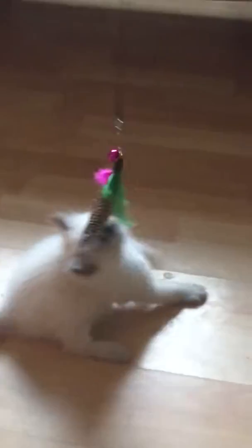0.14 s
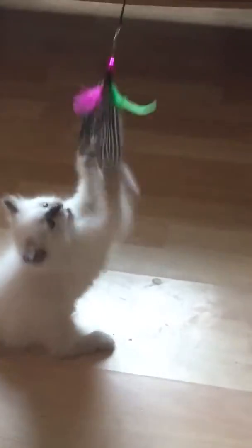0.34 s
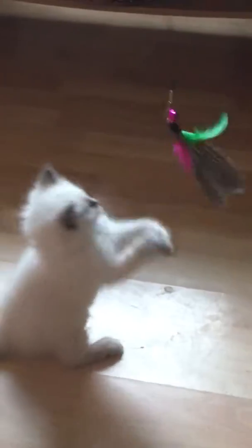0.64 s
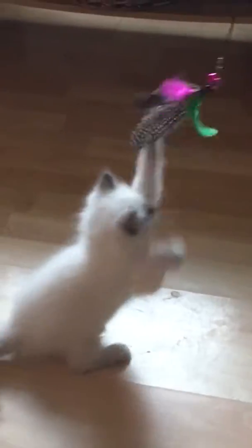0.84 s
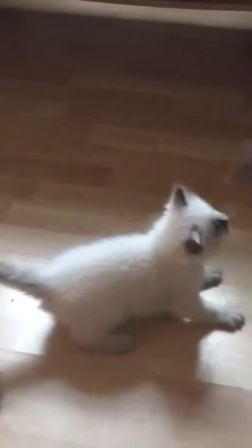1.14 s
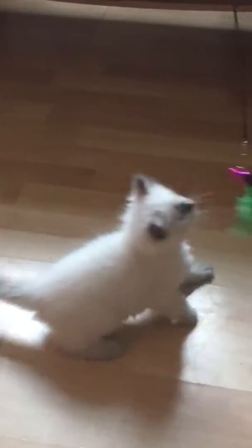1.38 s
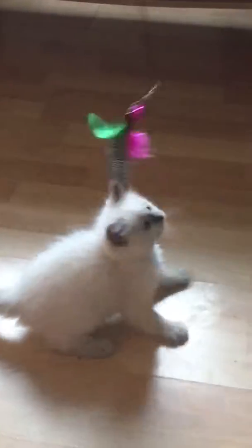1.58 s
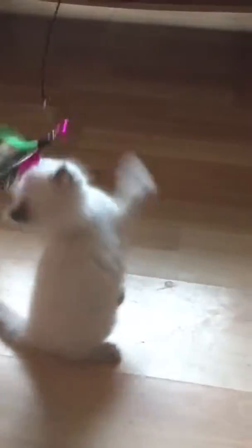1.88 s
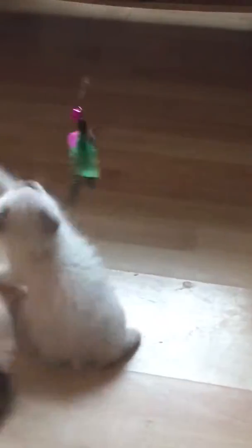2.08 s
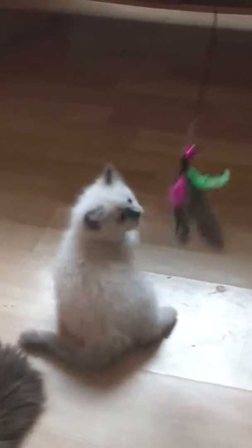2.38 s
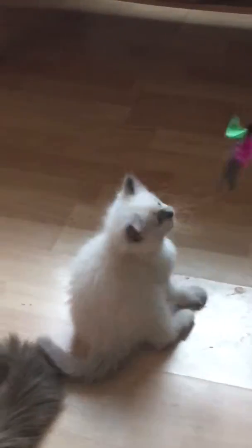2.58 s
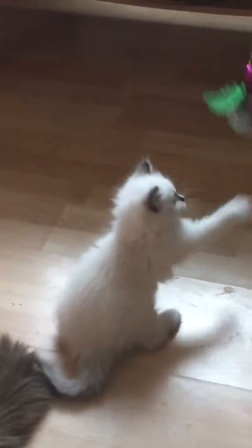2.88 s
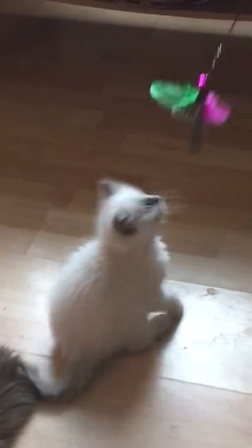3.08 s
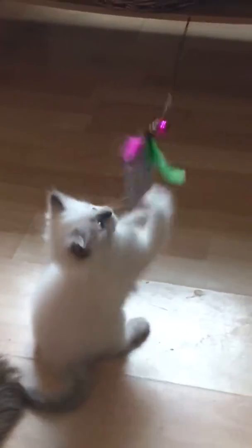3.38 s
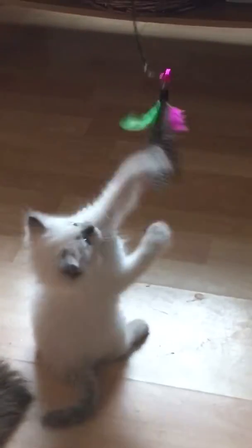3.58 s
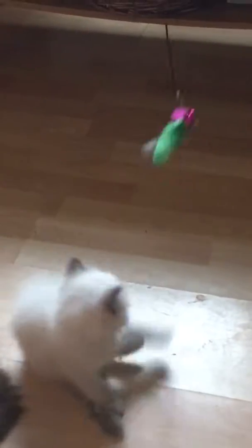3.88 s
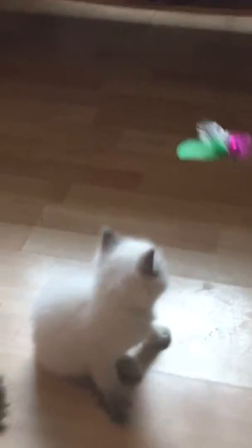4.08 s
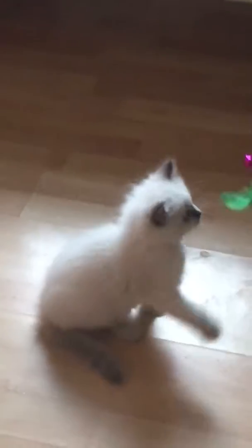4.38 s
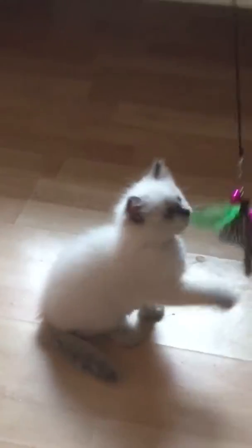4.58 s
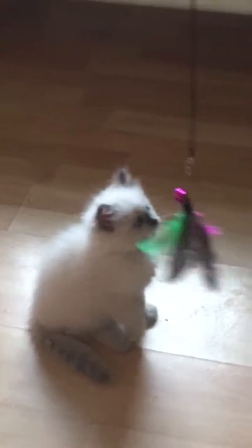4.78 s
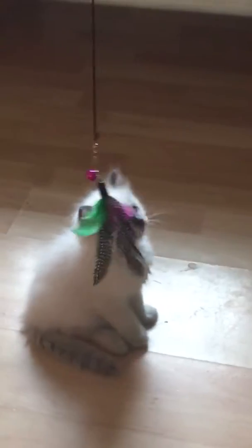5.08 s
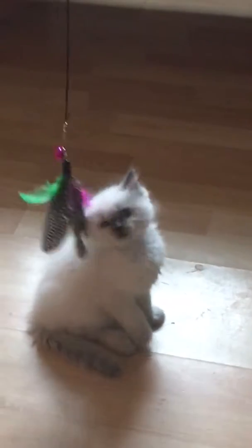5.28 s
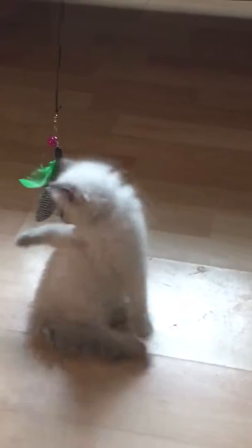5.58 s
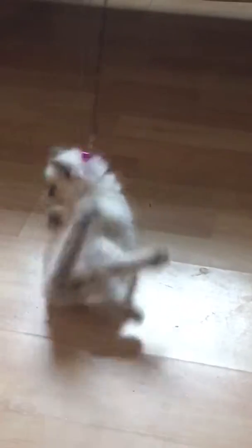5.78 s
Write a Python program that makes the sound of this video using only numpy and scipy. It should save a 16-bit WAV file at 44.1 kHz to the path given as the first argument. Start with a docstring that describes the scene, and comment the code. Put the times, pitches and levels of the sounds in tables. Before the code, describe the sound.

A tiny bell jingles in bursts as a kitten bats a feather toy, with rustles and paws knocking on a hard floor.

```python
"""Kitten batting a feather toy.

The toy dangles on a string above a laminate floor in a quiet room. A pellet strikes the shell of
its tiny bell in bursts; clasp and claws tick, feathers rustle and quills snap. Paws knock and thud
on the boards, the claws skid once, and something rubs faintly with a hollow tone."""
import sys
import numpy as np
from scipy import signal
from scipy.fft import rfft, irfft
from scipy.io import wavfile

SR = 44100
rng = np.random.default_rng(int(sys.argv[2]) if len(sys.argv) > 2 else 0)


def inscribe(sig):
    """Save sig as 16-bit PCM at rate SR to the path in sys.argv[1].

    A 1-D sig is mono; a 2-D sig holds one channel per row.
    Samples are clipped to [-1, 1] before scaling.
    """
    pcm = np.round(np.clip(np.atleast_2d(sig).T, -1, 1) * 32767)
    wavfile.write(sys.argv[1], SR, pcm.astype(np.int16))


N = 261954

# Table levels are relative; each source adds its own gain.
# spectra: (frequency [Hz], density [dB])
AIR_SPECTRUM = [(15, -30), (25, -17.5), (53, 3.5), (92, -0.5), (229, -6), (754, -17.5), (1070, -17),
                (1370, -21), (4030, -23.5), (6740, -24), (7510, -27.5), (10400, -23), (14800, -19.5),
                (16000, -32.5)]
THUD_SPECTRUM = [(30, -8), (55, -0.5), (100, -1.5), (200, 4), (290, 3.5), (420, -15), (900, -38)]
TAP_SPECTRUM = [(300, -76), (700, 4.5), (1200, 5.5), (2400, -3.5), (4000, -1.5), (7000, -4.5), (15000, -32)]
SKID_SPECTRUM = [(300, -13), (950, -4), (1500, -4.5), (2000, 4.5), (2500, 5.5), (3200, -8), (6000, -11),
                 (15000, -18)]
FEATHER_SPECTRUM = [(400, -1), (1500, -4), (3200, -8), (5200, 1), (8000, 5), (10300, -3), (12000, 0),
                    (16000, -1)]
TICK_TOP_SPECTRUM = [(1500, -58), (5000, -11), (8000, -14), (11500, -4), (15000, -5.5)]
TICK_BODY_SPECTRUM = [(600, -10), (1600, -4.5), (3500, -2.5), (5200, -3), (7000, -1), (10000, -15)]
CLACK_SPECTRUM = [(1500, -26), (3700, -14), (4900, 0), (6200, -2.5), (8300, 1.5), (10200, -6), (11500, -1),
                  (16000, -7)]
# reverberation: (frequency [Hz], T60 [s])
ROOM_DECAY = [(150, 0.27), (600, 0.43), (2500, 0.41), (7500, 0.3), (15000, 0.24)]

# friction strokes: (start [s], length [s], level [dB])
RUB_STROKES = [(2.05, 0.44, -75), (4.03, 0.27, -81)]
SHUFFLE_STROKES = [(.43, 0.12, -65), (1.36, 0.054, -63.5), (1.73, 0.088, -60.5), (2.15, 0.39, -66.5),
                   (4.2, 0.42, -72)]
SKID_STROKES = [(.405, 0.048, -53)]
FEATHER_STROKES = [(0.0, 0.26, -63.5), (.44, 0.18, -62), (.97, 0.18, -57.5), (1.33, 0.19, -70),
                   (1.7, 0.13, -60), (2.04, 0.14, -56), (2.35, 0.091, -56.5), (2.77, 0.06, -62.5),
                   (3.19, 0.32, -63), (4.17, .3, -66), (5.25, .3, -69), (5.6, .3, -74.5)]
# rub resonances: (frequency [Hz], width per filter pass [Hz], level [dB])
RUB_MODES = [(1745, 160, 0.5), (3340, 220, -7)]

# paw landings: (time [s], knock [dB], pad thud [dB], claw tap [dB])
LANDINGS = [(0.407, -47.5, -72, -53), (0.417, -50.5, -53, -66), (0.854, -56.5, -58, -69),
            (1.165, -37.5, -49.5, -49.5), (1.183, -31, -65, -49.5), (1.196, -43, -69, -58),
            (1.226, -51, -52.5, -54.5), (1.252, -63, -54, -66), (1.39, -75, -59, -60),
            (1.658, -42.5, -57, -78), (1.665, -47, -54, -55.5), (1.786, -49.5, -64, -52),
            (1.974, -57, -66, -62.5), (2.135, -37, -53, -47), (2.146, -32, -54, -56),
            (3.913, -51.5, -69, -90), (4.885, -80, -66.5, -76)]
# floorboard modes: (frequency [Hz], level [dB], T60 [s])
FLOOR_MODES = [(532.5, -3, 0.036), (617, -0.5, 0.042), (741, -12, 0.059), (870, -6, 0.025),
               (1080, -46, 0.0083), (1830, -11, 0.012), (2060, -14, 0.0081)]
# claws and clasp on the toy: (time [s], level [dB], body re level [dB])
TOY_TICKS = [(0.0667, -51.5, 1), (0.3208, -53.5, -1.5), (0.4758, -50.5, -7), (0.5105, -42.5, -19),
             (0.74, -47.5, -4.5), (0.8818, -52, 1), (0.9344, -54, 4.5), (1.0375, -54.5, 5.5),
             (1.3747, -60.5, 3.5), (1.4872, -54.5, -9), (1.552, -56.5, -3), (2.09, -37.5, -17),
             (2.2962, -42, -10), (2.8406, -53, 1), (3.26, -54.5, -3.5), (4.2531, -49, -11)]
# loudest quill snaps: (time [s], level [dB])
QUILL_SNAPS = [(0.2447, -45.5), (2.0893, -36), (3.3642, -40), (4.4872, -50.5), (5.333, -46),
               (5.3833, -45.5), (5.415, -44), (5.5008, -47), (5.5302, -43), (5.5539, -44), (5.7325, -48.5),
               (5.7545, -48), (5.785, -41), (5.8154, -45.5)]
# pellet strikes on the shell: (time [s], ring [dB], clack [dB])
PELLET_STRIKES = [(0.1376, -50, -51.5), (0.1916, -36, -43.5), (0.5658, -50, -49), (0.5809, -36.5, -44.5),
                  (0.6839, -66, -48.5), (0.734, -35.5, -45), (0.7486, -31.5, -38.5), (0.7847, -38.5, -46.5),
                  (0.8243, -43, -68), (0.957, -54, -45), (0.965, -42.5, -55), (1.046, -40.5, -53),
                  (1.0676, -42, -55), (1.093, -47, -44), (1.106, -39, -41.5), (1.1118, -35.5, -48),
                  (1.1385, -43, -58), (1.1824, -58, -41), (1.5665, -40.5, -44), (1.6358, -46.5, -57),
                  (1.7473, -32.5, -38.5), (1.7563, -31, -42), (1.768, -35.5, -42), (1.7919, -36.5, -43.5),
                  (1.8472, -24.5, -40), (1.857, -19.5, -39.5), (1.872, -36, -40), (1.8852, -48, -42.5),
                  (1.9293, -47, -44.5), (1.94, -23, -41.5), (2.0143, -56.5, -56), (2.0598, -78, -45.5),
                  (2.0915, -52, -42.5), (2.1296, -41.5, -46), (2.261, -51.5, -68), (2.2896, -38, -40),
                  (2.326, -39.5, -51), (2.3605, -50, -65), (2.4115, -53, -42.5), (2.4254, -38, -38.5),
                  (2.4387, -24.5, -57), (2.6362, -51, -52), (2.8401, -37, -38.5), (2.8769, -34.5, -46),
                  (2.9257, -35.5, -50), (3.1037, -45, -56.5), (3.1524, -36, -53), (3.2229, -45.5, -52.5),
                  (3.2444, -55, -49), (3.2722, -37, -45.5), (3.373, -45, -37.5), (3.3796, -40, -38),
                  (3.4222, -34.5, -47), (3.5223, -47, -48), (3.537, -40, -55), (3.6533, -45, -50.5),
                  (3.7041, -45, -70), (3.7814, -48, -50), (3.851, -48, -59), (3.8604, -42, -42.5),
                  (4.182, -48, -53), (4.2056, -32, -45.5), (4.2322, -27.5, -37.5), (4.243, -32, -60),
                  (4.2652, -29.5, -42.5), (4.272, -35, -43), (4.2951, -20.5, -39.5), (4.3362, -41.5, -48),
                  (4.3699, -37, -51), (4.603, -48, -58), (4.6592, -46, -59), (4.7122, -46, -57),
                  (4.7241, -38.5, -50), (5.1836, -45.5, -55.5), (5.3527, -60, -62), (5.8675, -61, -69),
                  (5.921, -52, -60.5)]
# bell modes: (offset from struck pitch [Hz], level [dB], T60 re main mode [ratio])
SHELL_MODES = [(0, -4, 1.0), (98, -9.5, .7), (-290, -17.5, .5), (653, -16.5, 1.0), (-2620, -33.5, .5),
               (-2000, -25, .5), (-1600, -28.5, .4)]


def from_db(db):
    """Decibels to gain."""
    return 10 ** (np.asarray(db) / 20)


def unit_rms(x):
    """Scale to rms 1."""
    return x / np.sqrt(np.mean(x ** 2) + 1e-20)


def at_hz(table, hz):
    """Interpolate on a log-frequency axis."""
    freqs_hz, values = np.transpose(table)
    return np.interp(np.log(np.maximum(hz, 1)), np.log(freqs_hz), values)


def decay(t60_s, count):
    """Envelope falling 60 dB in t60_s."""
    return from_db(-60 * np.arange(count) / SR / max(t60_s, .001))


def add(track, time_s, sound):
    """Mix a sound into a track."""
    i = int(np.clip(round(time_s * SR), 0, N - 1))
    track[i:i + len(sound)] += sound[:N - i]


def colour(x, spectrum, size=8192):
    """Minimum-phase filter, unit power gain, rolled off below the spectrum's first point."""
    hz = np.arange(size // 2 + 1) * SR / size
    gain = unit_rms(from_db(at_hz(spectrum, hz)) * (hz + 1) / np.hypot(hz + 1, spectrum[0][0] / 2))
    cepstrum = irfft(np.log(gain))
    cepstrum[1:size // 2] *= 2
    cepstrum[size // 2 + 1:] = 0
    return signal.fftconvolve(x, irfft(np.exp(rfft(cepstrum))))[:N]


def grains(rate_hz, spread_db):
    """Random micro-contacts of uneven size, rms 1."""
    sizes = from_db(spread_db * np.minimum(rng.exponential(1, N), 4)) * rng.choice([-1, 1], N)
    return unit_rms(sizes * (rng.random(N) < rate_hz / SR))


def bursts(times_s, levels_db, t60_s, count=8192):
    """Short contacts: noise with instant onset and exponential decay."""
    out = np.zeros(N)
    for time_s, db in zip(times_s, levels_db):
        add(out, time_s, from_db(db) * decay(t60_s, count) * rng.choice([-1, 1], count))
    return out


def strokes(rows, attack_s, release_t60_s):
    """Power sum of envelopes that swell, hold and die."""
    t, gains = np.arange(N) / SR, []
    for start_s, length_s, db in rows:
        attack = np.clip((t - start_s) / attack_s, 0, 1)
        gains.append(attack * from_db(db - 60 * np.maximum(t - start_s - length_s, 0) / release_t60_s))
    return np.linalg.norm(gains, axis=0)


def room(x, wet_db, delay_s=0.0092, count=22000):
    """Direct sound plus diffuse reflections, shortest in the treble."""
    tail, edges_hz = np.zeros(count), np.geomspace(60, 18000, num=9)
    for low_hz, high_hz in zip(edges_hz, edges_hz[1:]):
        bandpass = signal.butter(2, [low_hz, high_hz], "band", fs=SR, output="sos")
        t60_s = at_hz(ROOM_DECAY, np.sqrt(low_hz * high_hz))
        tail += signal.sosfilt(bandpass, rng.standard_normal(count)) * decay(t60_s, count)
    tail *= np.arange(count) / SR > delay_s
    return x + from_db(wet_db) * signal.fftconvolve(x, tail / np.linalg.norm(tail))[:N]


def air(level_db=-67.5):
    """Steady room tone."""
    return from_db(level_db) * colour(rng.standard_normal(N), AIR_SPECTRUM)


def rubbing():
    """Fine friction excites two narrow resonances."""
    friction, out = grains(rate_hz=3000, spread_db=-1.0), 0
    for hz, width_hz, db in RUB_MODES:
        peak = signal.iirpeak(hz, hz / width_hz, fs=SR)
        out += from_db(db) * unit_rms(signal.lfilter(*peak, signal.lfilter(*peak, friction)))
    return strokes(RUB_STROKES, attack_s=0.091, release_t60_s=0.68) * out


def shuffle():
    """Weight shifts: pads and haunches bump along the floor."""
    envelope = strokes(SHUFFLE_STROKES, attack_s=0.019, release_t60_s=0.19)
    return colour(envelope * grains(rate_hz=240, spread_db=2.5), THUD_SPECTRUM)


def skid(rumble_db=-5.5):
    """Claws stick and slip on the grain; the floor rumbles below."""
    envelope = strokes(SKID_STROKES, attack_s=0.0026, release_t60_s=0.22)
    slips = envelope * grains(rate_hz=2100, spread_db=2.0)
    return colour(slips, SKID_SPECTRUM) + from_db(rumble_db) * colour(slips, THUD_SPECTRUM)


def paws(knock_gain_db=-5.0, tap_gain_db=0.5, count=8192):
    """Each landing knocks a loose board; the pad thuds, the claws tap."""
    times_s, knocks_db, thuds_db, taps_db = np.transpose(LANDINGS)
    boards, t = np.zeros(N), np.arange(count) / SR
    for time_s, db in zip(times_s, knocks_db + knock_gain_db):
        for hz, mode_db, t60_s in FLOOR_MODES:
            detune, strength = rng.standard_normal(2)   # varies with the spot hit
            tone = np.sin(2 * np.pi * hz * (1 + .015 * detune) * t)
            add(boards, time_s, from_db(db + mode_db + 2 * strength) * decay(t60_s, count) * tone)
    highpass = signal.butter(4, 440, "high", fs=SR, output="sos")   # thin boards radiate little bass
    thuds = colour(bursts(times_s, thuds_db, t60_s=0.081), THUD_SPECTRUM)
    taps = colour(bursts(times_s, taps_db + tap_gain_db, t60_s=0.063), TAP_SPECTRUM)
    return signal.sosfilt(highpass, boards) + thuds + taps


def feathers(hiss_db=-2.5, crackle_db=-15.0):
    """Barbs brush fur in dense grains; a few catch and flick free."""
    envelope = strokes(FEATHER_STROKES, attack_s=.06, release_t60_s=0.56)
    hiss = colour(envelope * grains(rate_hz=4700, spread_db=4.0), FEATHER_SPECTRUM)
    crackle = colour(envelope * grains(rate_hz=86, spread_db=2.0), TICK_TOP_SPECTRUM)
    return from_db(hiss_db) * hiss + from_db(crackle_db) * crackle


def ticks(rows, t60_s, snap_db=8.0, scratch_db=1.5):
    """Sharp snap, then a short scratch; the walls return less top than body."""
    times_s, db, body_db = np.transpose(rows)
    snap = bursts(times_s, db + snap_db, t60_s=0.0012)
    scratch = bursts(times_s, db + scratch_db, t60_s)
    top = colour(snap + scratch, TICK_TOP_SPECTRUM)
    body = colour(bursts(times_s, db + body_db, t60_s), TICK_BODY_SPECTRUM)
    return room(top, wet_db=-9.0) + room(body, wet_db=-4.5)


def quills(run_start_s=5.7, run_length_s=0.24, rate_hz=56, run_db=-52.5, spread_db=4.0, body_db=-26):
    """Quills flick free; a run of small snaps as feathers drag over the kitten's head."""
    slots_s = np.arange(run_start_s, run_start_s + run_length_s, 1 / rate_hz)
    run = [(s + rng.random() / rate_hz, run_db + spread_db * rng.standard_normal()) for s in slots_s]
    return ticks([(time_s, db, body_db) for time_s, db in QUILL_SNAPS + run], t60_s=0.0011)


def pellet_hits(rebounds=2, flight_s=.024, ring_loss_db=15, clack_loss_db=15.5):
    """Strikes and ever softer rebounds, sorted: (time [s], ring [dB], clack [dB])."""
    hits = []
    for time_s, ring_db, clack_db in PELLET_STRIKES:
        delays_s = np.append(0, np.cumsum(flight_s * (.5 + rng.random(rebounds))))
        for k, delay_s in enumerate(delays_s):
            hits.append((time_s + delay_s, ring_db - k * ring_loss_db, clack_db - k * clack_loss_db))
    return np.array(sorted(hit for hit in hits if hit[0] < N / SR))


def pellet(hits, clack_db=3.5, roll_db=-7.5, shell_db=-3.5, shell_hz=7500, width_hz=300):
    """The pellet clacks, then skitters inside and keeps the shell singing."""
    times_s, _, db = np.transpose(hits)
    roll = bursts(times_s, db + roll_db, t60_s=0.095) * grains(rate_hz=3500, spread_db=2.5)
    peak = signal.iirpeak(shell_hz, shell_hz / width_hz, fs=SR)
    singing = signal.lfilter(*peak, roll) * np.sqrt(SR / np.pi / width_hz)   # same power as the roll
    clacks = bursts(times_s, db + clack_db, t60_s=0.009)
    return colour(clacks + roll, CLACK_SPECTRUM) + from_db(shell_db) * singing


def bell(hits, gain_db=3.5, rise_s=0.00081, choke_t60_s=0.031, count=12000,
         ref_db=-40, ref_hz=7482, ref_t60_s=0.064, sag_hz_per_db=2.5, damping_per_db=0.0426,
         scatter_hz=30, detune_hz=35):
    """Each hit rings the shell until a harder one chokes it."""
    out, t = np.zeros(N), np.arange(count) / SR
    times_s, rings_db, _ = hits.T
    for time_s, db in zip(times_s, rings_db):
        gap_s = np.min(times_s[(times_s > time_s) & (rings_db > db)], initial=N / SR) - time_s
        gate = (1 - np.exp(-t / rise_s)) * from_db(-60 * np.maximum(t - gap_s, 0) / choke_t60_s)
        # the pellet presses on the shell: harder hits ring lower and shorter
        hz = ref_hz - sag_hz_per_db * (db - ref_db) + scatter_hz * rng.standard_normal()
        t60_s = ref_t60_s * np.exp(-damping_per_db * (db - ref_db))
        for k, (offset_hz, mode_db, t60_ratio) in enumerate(SHELL_MODES):
            detune, uneven_db = rng.standard_normal(2) * (k > 0)   # side modes vary with the spot hit
            tone = np.sin(2 * np.pi * (hz + offset_hz + detune_hz * detune) * t)
            gain = from_db(db + gain_db + mode_db + uneven_db)
            add(out, time_s, gain * gate * decay(t60_s * t60_ratio, count) * tone)
    return out


def scene():
    """Toy, kitten on the floor and room tone; mono."""
    hits = pellet_hits()
    jingle = room(bell(hits) + pellet(hits), wet_db=-9.0)
    floor = room(paws() + skid() + shuffle(), wet_db=-9.0)
    room_tone = air()
    toy = jingle + feathers() + ticks(TOY_TICKS, t60_s=0.029) + quills()
    return (room_tone + rubbing() + floor + toy)[None]


def record(dry, cutoff_hz=16100):
    """Steep low-pass."""
    return signal.sosfilt(signal.ellip(10, .2, 70, cutoff_hz, fs=SR, output="sos"), dry)


dry = scene()
out = record(dry)
inscribe(out)
```